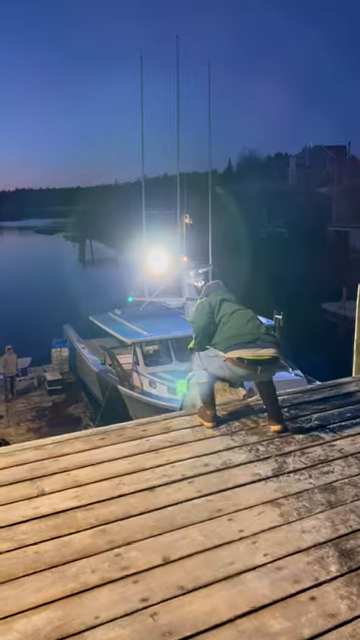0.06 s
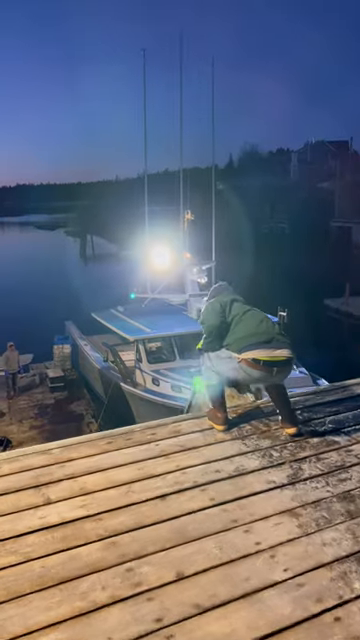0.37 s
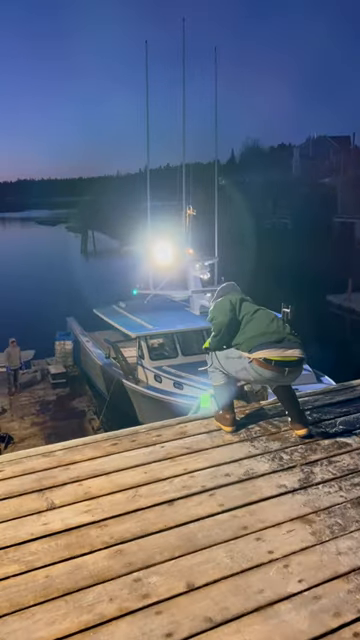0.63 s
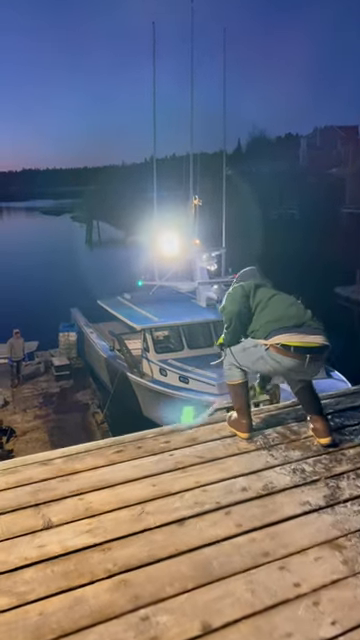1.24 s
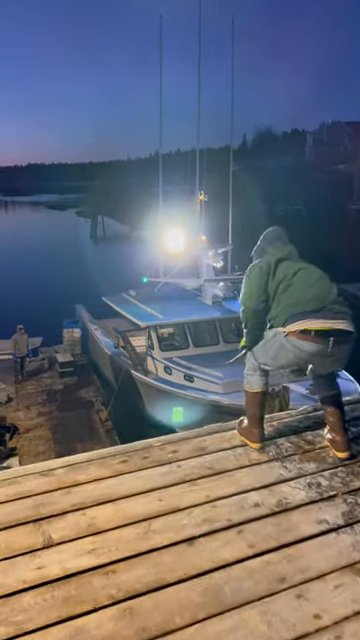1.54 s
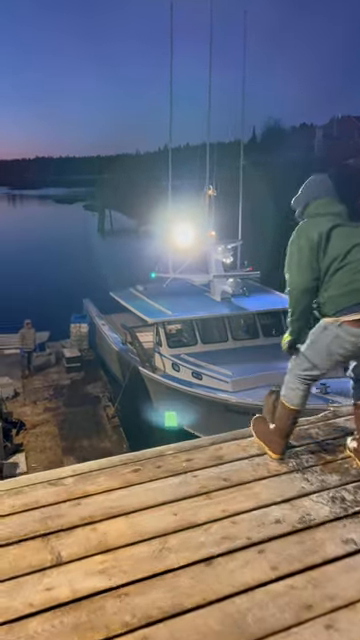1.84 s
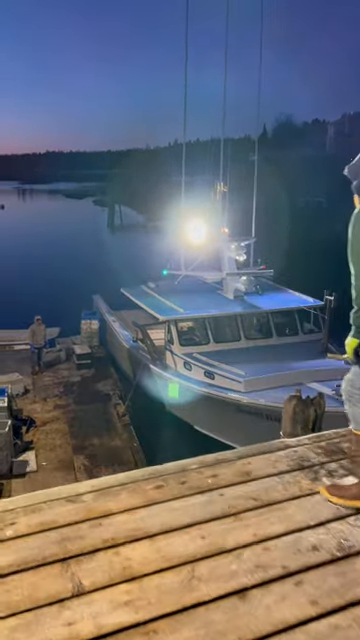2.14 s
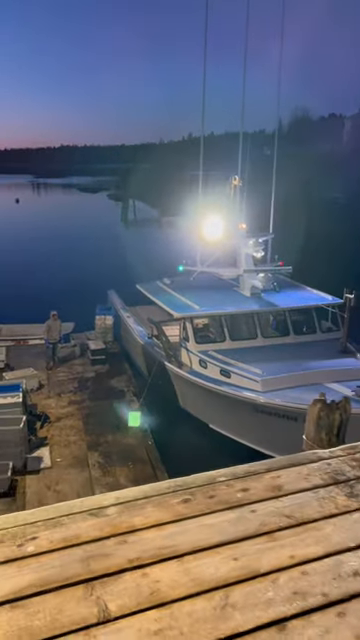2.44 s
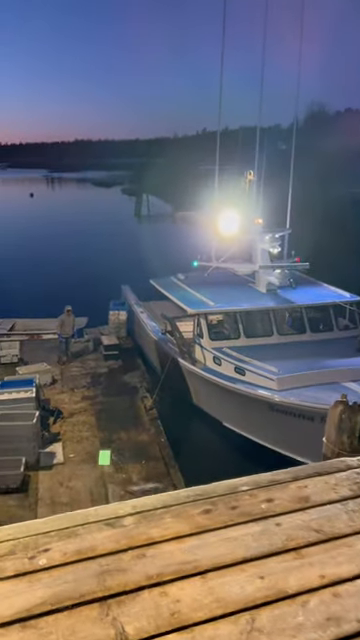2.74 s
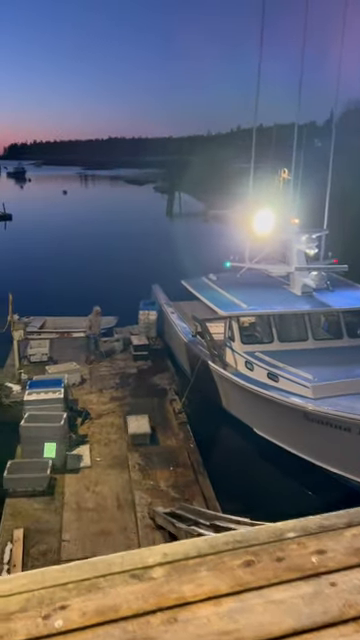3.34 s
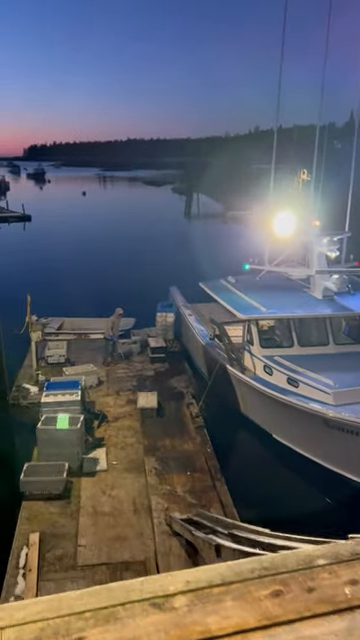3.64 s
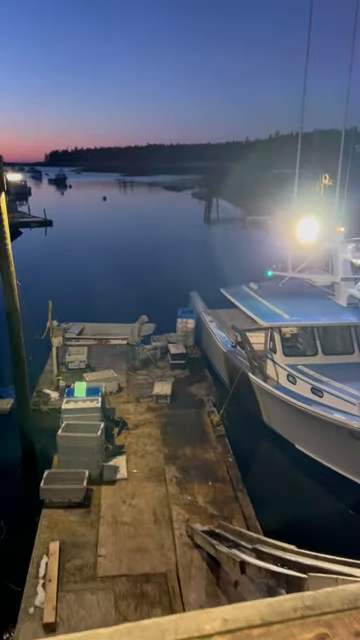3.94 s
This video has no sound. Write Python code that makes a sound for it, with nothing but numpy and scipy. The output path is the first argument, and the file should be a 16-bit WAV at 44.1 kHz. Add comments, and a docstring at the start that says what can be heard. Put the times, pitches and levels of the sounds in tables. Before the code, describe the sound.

A boat's diesel idles with a low, pulsing rumble while a smaller engine slowly speeds up. Boots thud on the wooden wharf, landing hardest close to the microphone, then something, probably a rope, hisses over the boards.

```python
"""On a wooden wharf, a stereo pair of microphones above the water. Below, a fishing boat's diesel idles,
one exhaust beat per cycle over its clatter, while a second, smaller engine picks up speed.
A man in rubber boots steps back hauling a line; each step rings and thuds the planks, and he lands
heavily close to the microphones. Something he drags, probably the rope, hisses over the boards."""
import sys
import numpy as np
from scipy.fft import rfft, irfft, next_fast_len
from scipy.io import wavfile
from scipy.ndimage import map_coordinates

SR = 44100
rng = np.random.default_rng(int(sys.argv[2]) if len(sys.argv) > 2 else 0)


def dump_mix(stems):
    """Bounce the given channels to the path in sys.argv[1] as a 16-bit WAV at rate SR."""
    frames = np.atleast_2d(stems).T  # one column per channel
    limited = np.clip(frames, -1, 1)  # hard clip at full scale
    pcm = np.round(limited * 32767).astype(np.int16)
    wavfile.write(sys.argv[1], SR, pcm)


N = 176400


def amp(db):
    """Decibels to gain."""
    return 10 ** (np.asarray(db) / 20)


def unit(x):
    """Scale to rms 1."""
    return x / np.sqrt(np.mean(x ** 2) + 1e-20)


def along(points, hz):
    """Read (frequency, value) points on a log axis."""
    freqs, values = np.transpose(points)
    return np.interp(np.log(hz + 1), np.log(freqs + 1), values)


def curves(rows):
    """One value per sample for each column after the time."""
    time_s, *columns = np.transpose(rows)
    return [np.interp(np.arange(N) / SR, time_s, column) for column in columns]


def wobble(rate):
    """A smooth random curve, rate knots a second."""
    return map_coordinates(rng.standard_normal(SR // 8), [np.arange(N) * rate / SR], mode="mirror")


def filtered(x, response):
    """Pass x through a response given as a function of frequency."""
    size = 2 * next_fast_len(N // 2 + SR // 4)
    return irfft(rfft(x, size) * response(np.fft.rfftfreq(size, 1 / SR)), size)[..., :N]


def causal(gain):
    """The response with this gain that rings only after a pulse."""
    cepstrum = irfft(np.log(gain))
    half = len(cepstrum) // 2
    cepstrum[1:half] *= 2
    cepstrum[half + 1:] = 0
    return np.exp(rfft(cepstrum))


# How alike noise is at the two microphones: frequency_hz, correlation
MIC_LIKENESS = [(100, .997), (350, .99), (680, .94), (1100, .995), (1700, .99), (2600, .9), (6000, .92),
                (11000, .88)]

def rush(spectrum):
    """Stereo noise of rms 1, nearly mono in the bass; the spectrum sets only its colour."""
    def response(hz):
        spread = np.arccos(np.clip(along(MIC_LIKENESS, hz), -1, 1)) / 2
        return amp(along(spectrum, hz)) * [np.cos(spread), np.sin(spread)]
    mid, side = filtered(rng.standard_normal((2, N)), response)
    return unit(np.array([mid + side, mid - side]))


# The diesel's exhaust note: multiple_of_cycle_rate, gain_db
EXHAUST_NOTE = [(1, -0.5), (2, -20.5), (3, 5.5), (4, 1), (5, 3), (6, -1), (7, -5), (8, -5.5), (9, -15),
                (10, -2), (11, -24), (13, -15), (16, -15.5), (30, -69), (60, -82.5)]
# Its combustion and machinery noise: frequency_hz, density_db
CLATTER_SPECTRUM = [(20, -20), (35, -23), (50, 2), (85, 1.5), (115, -3.5), (170, -0.5), (300, -13),
                    (600, -12), (850, -23.5), (1050, -17), (1300, -25.5), (1550, -17.5), (1750, -21),
                    (2000, -34), (3100, -37), (4500, -46.5), (7000, -53.5), (12000, -62)]

def diesel(cycle_hz=15.026, first_beat_s=.027, jitter_s=.0003, scatter_db=.9, hum_hz=221.6):
    """Below the wharf: one lumpy beat per cycle rings the exhaust, over pulsing clatter and a hum."""
    def exhaust(hz):
        smear = np.exp(1j * np.pi * .02 * hz ** 2 / 150)  # deep orders lag: 20 ms per 150 Hz
        return causal(amp(along(EXHAUST_NOTE, hz / cycle_hz))) * smear
    t = np.arange(N) / SR
    beats_s = np.arange(first_beat_s, N / SR - .005, 1 / cycle_hz)
    timing, strength = rng.standard_normal((len(beats_s), 2)).T
    starts = np.clip((beats_s + jitter_s * timing) * SR, 0, N - 1).astype(int)
    pulses = np.zeros(N)
    pulses[starts] = amp(scatter_db * strength)
    note = unit(filtered(pulses, exhaust))
    note_db = -24 - .34 * (t - t.mean())  # fainter as the microphones turn away
    clatter = rush(CLATTER_SPECTRUM) * (1 + .044 * np.cos(2 * np.pi * cycle_hz * (t - first_beat_s)))
    hum = np.sin(2 * np.pi * hum_hz * t + .5 * wobble(6)) * amp(1.5 * wobble(5))
    return amp(note_db) * note + amp(-33) * clatter + amp(-38) * hum


# The small engine's speed: time_s, speed_hz
ENGINE_SPEED = [(0, 36), (.15, 40.5), (.35, 43.8), (.58, 45.8), (.72, 44.6), (.85, 45.7), (1.1, 46.4),
                (1.3, 47.6), (1.48, 49.1), (1.75, 49.6), (1.9, 49.1), (2.1, 49.8), (2.3, 50.9), (2.5, 52),
                (4, 55)]
# Its strong orders: multiple_of_speed
ENGINE_ORDERS = [2, 3, 8, 10, 12]
# Their levels: time_s, then level_db for each of orders 2, 3, 8, 10, 12
ORDER_LEVELS = [(0, -33, -33.5, -60, -70, -64), (0.451, -32, -28.5, -43, -53, -59),
                (.7, -30.5, -33, -42, -63, -42), (1.0, -50, -28.5, -38.5, -67, -36),
                (1.3, -30.5, -43.5, -44, -74, -48.5), (1.7, -29, -36.5, -37.5, -44, -64),
                (2.2, -43, -39.5, -37.5, -37.5, -50), (2.6, -35.5, -37.5, -43, -46.5, -41),
                (4, -34.5, -45.5, -61, -56, -90)]
# The swell of its exhaust roar: time_s, level_db
ROAR_SWELL = [(0, -46), (.25, -40.5), (.5, -31.5), (1, -35.5), (1.4, -35.5), (2.1, -31.5), (2.5, -33),
              (3.2, -33), (4, -34)]
# The roar's colour: frequency_hz, density_db
ROAR_SPECTRUM = [(100, -6), (280, -3.5), (400, 0), (500, -4), (610, 0.5), (690, -9), (780, -8),
                 (950, -15.5), (2000, -49)]

def small_engine(waver_db=1.8, drone_waver_db=3, drone_share=.42):
    """A second engine: its orders climb with its speed over an exhaust roar, part rush, part drone."""
    speed_hz, = curves(ENGINE_SPEED)
    roar_db, = curves(ROAR_SWELL)
    angle = 2 * np.pi * np.cumsum(speed_hz) / SR
    tones, drone = np.zeros((2, N))
    for order, level_db in zip(ENGINE_ORDERS, curves(ORDER_LEVELS)):
        gain = amp(level_db + waver_db * wobble(9.9))
        tones += gain * np.sin(order * angle + .35 * wobble(14) + rng.uniform(0, 2 * np.pi))
    for order in range(6, 15):
        gain = amp(along(ROAR_SPECTRUM, order * speed_hz) + drone_waver_db * wobble(15))
        drone += gain * np.sin(order * angle + 1.1 * wobble(15) + rng.uniform(0, 2 * np.pi))
    pulsing_rush = rush(ROAR_SPECTRUM) * (1 + .15 * np.cos(angle))
    roar = np.sqrt(drone_share) * unit(drone) + np.sqrt(1 - drone_share) * pulsing_rush
    return np.sqrt(2) * tones + amp(roar_db) * roar


# The hiss of dragging over the boards: time_s, level_db
HISS_LEVEL = [(0, -51), (.09, -50.5), (.19, -64.5), (.27, -54.5), (.42, -80), (.58, -63), (.95, -81),
              (1.1, -60.5), (1.28, -47), (1.42, -42), (1.52, -43.5), (1.7, -42), (1.75, -45), (1.8, -34.5),
              (1.85, -46), (1.9, -37.5), (2.15, -42), (2.3, -42), (2.52, -37), (2.56, -43), (2.62, -36),
              (2.72, -35.5), (2.92, -34), (2.98, -27), (3.13, -23), (3.23, -27.5), (3.268, -25.5),
              (3.285, -34), (3.32, -23), (3.44, -25.5), (3.49, -28.5), (3.56, -26.5), (3.74, -29.5),
              (3.79, -25.5), (3.81, -32), (3.9, -31), (4, -36)]
# Its colour: frequency_hz, density_db
HISS_SPECTRUM = [(290, -53), (500, -45), (571, -8), (652, -41), (707, -8), (840, -12.5), (1030, -3.5),
                 (1390, -2.5), (2820, -2), (3390, -2.5), (4310, -9.5), (4790, -8), (5850, -7.5),
                 (10600, -10.5), (12000, -9), (15600, -47), (22000, -120)]
# The fine fizz on top: frequency_hz, density_db
FIZZ_SPECTRUM = [(2500, -40), (4800, 18), (5800, 2.5), (8000, -30), (11500, 7.5)]
# How late the first reflection off the deck reaches the microphones: time_s, delay_s
DECK_DELAY = [(0, 0.0032), (1.8, 0.0049), (2.9, 0.002), (3.27, 0.0044), (3.8, .0022), (4, 0.0016)]

def drag(grain_db=.98, flutter_db=1.5, echo_gain=.42, echo_top_hz=3200, echo_drift=.0545):
    """On the boards: grainy friction hiss; two dull deck reflections swirl through it as it moves."""
    level_db, = curves(HISS_LEVEL)
    delay_s, = curves(DECK_DELAY)
    hiss = rush(HISS_SPECTRUM)
    dulled = filtered(hiss, lambda hz: 1 / (1 + (hz / echo_top_hz) ** 4))
    for bounce in (1, 2):
        lag = SR * delay_s * bounce * np.exp(echo_drift * wobble(2.5))
        hiss += echo_gain * np.array([map_coordinates(side, [np.arange(N) - lag]) for side in dulled])
    fizz_db = np.minimum(level_db - 15.5, -55)  # follows the hiss up to a ceiling
    texture = amp(grain_db * wobble(900) + flutter_db * wobble(40))
    return texture * (amp(level_db) * unit(hiss) + amp(fizz_db) * rush(FIZZ_SPECTRUM))


# Boots meeting the planks: start_s, ring_db, ring_centre_hz, thud_db, grit_db, rise_s
BOOT_CONTACTS = [(0.69, -22.5, 200, -24.5, -25.5, 0.0026), (.698, -6.5, 233, -40, -44, 0.0011),
                 (0.769, -23, 172, -32, -32.5, .004), (1.762, -10, 410, -22, -35, .006),
                 (1.782, -15, 120, -23, -29, .002), (1.807, -30, 400, -17.5, -36, 0.0032),
                 (1.832, -21, 450, -31, -43, .002), (1.873, -21.5, 260, -21, -30, 0.006),
                 (2.577, 1.5, 374, -16.5, -38, 0.0058), (2.615, -4.5, 260, -15.5, -30, 0.0063),
                 (2.791, -24, 300, -19.5, -33, 0.0028), (2.847, -6, 443, -8.5, -12.5, 0.002),
                 (2.859, -1.5, 300, -10.5, -9.5, 0.0041), (2.878, -8, 261, -9, -16, 0.0039),
                 (2.893, -9, 430, -15, -19, 0.0035), (2.904, -1, 350, -12.5, -11, 0.0016),
                 (2.915, 3, 280, -11.5, -30, 0.0066), (2.95, -4, 236, -10, -25, 0.0024),
                 (2.968, -4, 173, -16, -28, .003), (3.29, -12.5, 330, -23.5, -16.5, 0.0027),
                 (3.31, -20, 270, -24, -26, 0.0012), (3.337, -23, 305, -20, -21, 0.002),
                 (3.353, -11, 180, -28, -27, 0.0035), (3.812, -8.5, 198, -20, -44, 0.0048),
                 (3.888, -16, 240, -27.5, -26, .004)]
# The planks' modes: pitch_hz, level_db, t60_s
PLANK_MODES = [(83.5, -4, 0.07), (144, 7, 0.11), (183, 4, 0.09), (239, 2.5, 0.064), (270.2, 1, 0.088),
               (335, 0, 0.1), (431, 5, 0.041), (540, -6, 0.034), (579, -2.5, 0.11), (705, 5.5, 0.04)]
# The thud of loose boards: frequency_hz, density_db
THUD_SPECTRUM = [(30, -16), (80, 1.5), (250, -0.5), (500, -4), (800, -9.5), (1400, -16), (2200, -21),
                 (3500, -30), (9000, -71)]
# Grit under the soles: frequency_hz, density_db
GRIT_SPECTRUM = [(300, -9), (1000, 14), (1600, 16), (2800, 6.5), (4800, -4.5), (6000, -3), (11000, -11)]
# The whole deck's afterring: frequency_hz, density_db
BOOM_SPECTRUM = [(60, -16), (85, -6), (150, -2), (300, 8), (500, 1), (900, -33), (3000, -71)]

def boots(ring_octaves=.58, thud_t60_s=.15, grit_t60_s=.048, boom_rise_s=.028, boom_t60_s=.57):
    """Close by: each contact rings the planks, thuds loose boards, crunches grit and booms the deck."""
    ring, thud_power, grit_power, boom_power = np.zeros((4, N))
    mode_hz, mode_db, mode_t60_s = np.transpose(PLANK_MODES)[:, :, None]
    for start_s, ring_db, centre_hz, thud_db, grit_db, rise_s in BOOT_CONTACTS:
        start = round(start_s * SR)
        t = np.arange(min(SR // 3, N - start)) / SR
        span = slice(start, start + len(t))
        strength, detune = rng.standard_normal((2, len(PLANK_MODES), 1))
        near_centre = np.exp(-.5 * (np.log2(mode_hz / centre_hz) / ring_octaves) ** 2)
        share = amp(mode_db + 1.37 * strength) * near_centre
        phase = 2 * np.pi * mode_hz * (1 + .03 * detune) * t + rng.normal(0, .98, mode_hz.shape)
        modes = share / np.linalg.norm(share) * amp(-60 * t / mode_t60_s) * np.sin(phase)
        rise = 1 - np.exp(-t / rise_s)
        boom_rise = 1 - np.exp(-t / boom_rise_s)
        ring[span] += amp(ring_db) * modes.sum(0) * rise
        thud_power[span] += (rise * amp(thud_db - 60 * t / thud_t60_s)) ** 2
        grit_power[span] += (rise * amp(grit_db - 60 * t / grit_t60_s)) ** 2
        boom_power[span] += (boom_rise * amp(thud_db - 12.5 - 60 * t / boom_t60_s)) ** 2
    thud = np.sqrt(thud_power) * rush(THUD_SPECTRUM)
    grit = np.sqrt(grit_power) * rush(GRIT_SPECTRUM)
    boom = np.sqrt(boom_power) * rush(BOOM_SPECTRUM)
    return ring + thud + grit + boom


# Clicks of the hardest landing: start_s, level_db
LANDING_SNAPS = [(2.849, -18), (2.949, -16)]
# Their colour: frequency_hz, density_db
SNAP_SPECTRUM = [(800, 2), (2000, 2), (5000, 1), (7000, -1), (12000, 2.5)]

def snaps(t60_s=.05):
    """Near the microphones: two brief bright clicks as the boots land hardest."""
    t = np.arange(N) / SR
    envelope = sum((t >= start_s) * amp(level_db - 60 * np.abs(t - start_s) / t60_s)
                   for start_s, level_db in LANDING_SNAPS)
    return rush(SNAP_SPECTRUM) * envelope


def scene():
    """From the wharf: both engines below, dragging and boots on the planks."""
    return diesel() + small_engine() + drag() + boots() + snaps()


# Level at the left microphone minus the right: frequency_hz, balance_db
MIC_BALANCE = [(85, .1), (180, 1.1), (350, 2), (650, 3.6), (1100, -.4), (1700, -.3), (2400, 4.6),
               (3500, 4.2), (5500, .3), (9000, 0)]
# Phase at the left microphone minus the right: frequency_hz, phase_rad
MIC_PHASE = [(40, -.04), (180, -.11), (350, -.17), (680, -.55), (1050, -.1), (1700, -.12), (2400, -.95),
             (3500, -.95), (6000, -.7), (9500, -1.55), (12000, -2.4)]

def record(dry, notch_hz=4865, notch_width_hz=280, ceiling=.95, low_cut_hz=14, top_hz=11950):
    """The two microphones differ in level and phase; peaks are rounded, deep rumble and top are cut."""
    def microphones(hz):
        sides = np.array([[.5], [-.5]])
        notch_db = -6.5 * np.exp(-((hz - notch_hz) / notch_width_hz) ** 2)  # a dip in both responses
        gain = amp(notch_db + along(MIC_BALANCE, hz) * sides)
        return gain * np.exp(1j * along(MIC_PHASE, hz) * sides)
    def passband(hz):
        return (1 - np.exp(-(hz / low_cut_hz) ** 2)) / (1 + (hz / top_hz) ** 90)
    picked_up = filtered(dry, microphones)
    rounded = picked_up / (1 + np.abs(picked_up / ceiling) ** 6) ** (1 / 6)
    return filtered(rounded, passband)


dry = scene()
out = record(dry)
dump_mix(out)
```